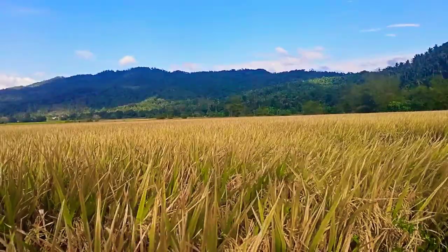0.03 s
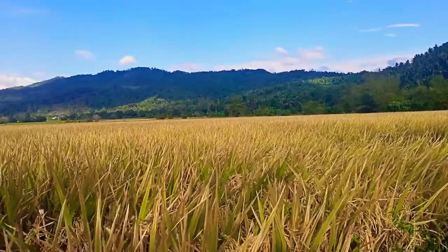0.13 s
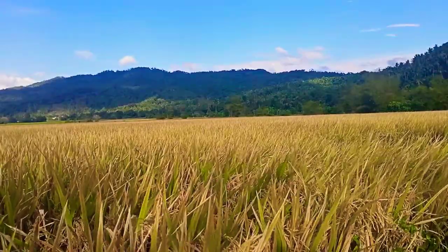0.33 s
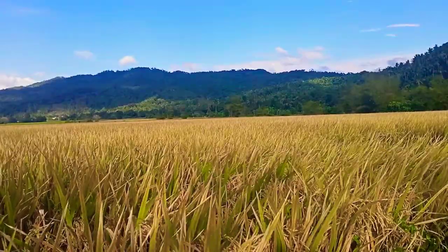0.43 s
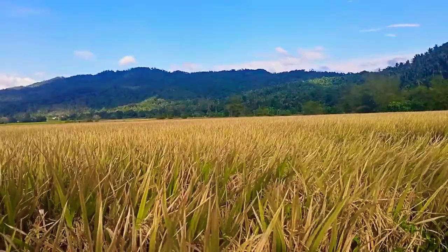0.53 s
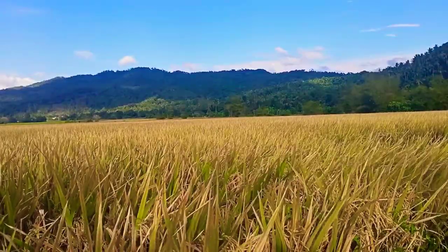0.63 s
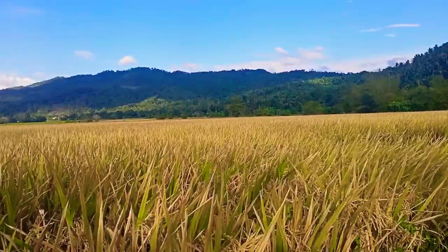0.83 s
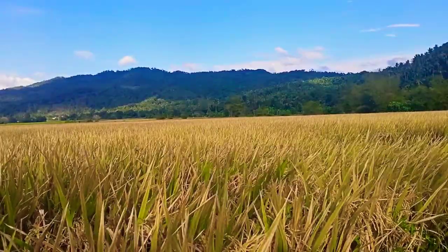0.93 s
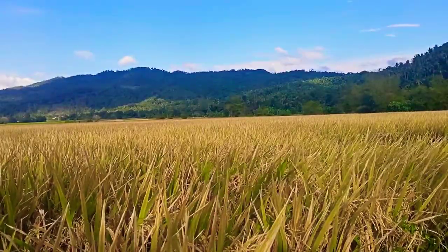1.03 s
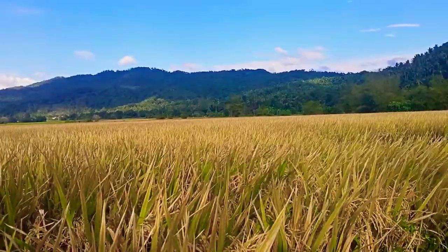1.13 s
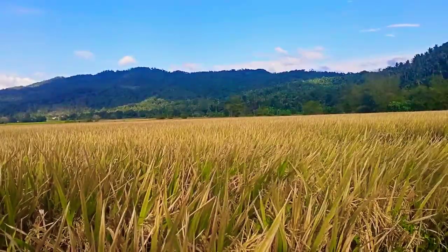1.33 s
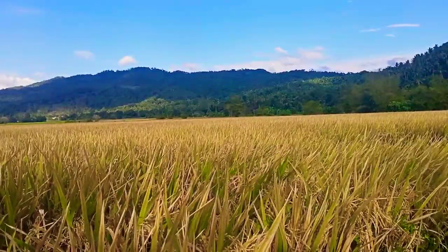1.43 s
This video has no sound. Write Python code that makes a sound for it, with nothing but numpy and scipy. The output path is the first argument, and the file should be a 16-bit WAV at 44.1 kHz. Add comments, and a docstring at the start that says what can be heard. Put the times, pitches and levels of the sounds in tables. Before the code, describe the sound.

Wind buffets the microphone in an open rice field, a low rumble with soft thumps that swells and then eases. Far behind it, leaves rustle softly, insects hiss high and a distant bird gives three faint, thin whistles.

```python
"""A gust of wind buffets the microphone in an open rice field: turbulence rumbles, single eddies thump,
and at the crest the air briefly flutters on the microphone's edge. Behind it, countless leaves blend
into a soft rustle and a far insect chorus hisses near 8 kHz. Two nearer insects buzz above the chorus,
one tiny ping for each wing stroke, and a far bird gives three thin whistles."""
import sys
import numpy as np
from scipy import signal
from scipy.fft import rfft, irfft
from scipy.io import wavfile
from scipy.ndimage import uniform_filter1d

SR = 44100
rng = np.random.default_rng(int(sys.argv[2]) if len(sys.argv) > 2 else 0)


def pcm_store(signal):
    """Save signal as 16-bit PCM."""
    levels = np.round(np.clip(np.atleast_2d(signal), -1, 1) * 32767)
    wavfile.write(sys.argv[1], SR, levels.astype(np.int16).T)


N = 66150
TIME = np.arange(N) / SR


def from_db(db):
    """Decibels to gain."""
    return 10 ** (np.asarray(db) / 20)


def rms_one(x):
    """Scale to unit power."""
    return x / np.sqrt(np.mean(x ** 2) + 1e-20)


def envelope(points):
    """Join (time, value) breakpoints with straight ramps."""
    return np.interp(TIME, *np.transpose(points))


def drift(rate_hz):
    """Smooth random modulation of spread 1, mostly slower than rate_hz."""
    hop, run_in = 40, 2000
    pole = np.exp(-2 * np.pi * hop * rate_hz / SR)
    white = rng.standard_normal(N // hop + run_in + 2)
    slow = signal.lfilter([1], [1, -2 * pole, pole * pole], white)[run_in:]
    return np.interp(np.arange(N) / hop, np.arange(len(slow)), rms_one(slow))


def noise(spectrum):
    """Noise of unit power with the given colour, rolling off below the lowest point."""
    hz, db = np.transpose(spectrum)
    bins_hz = np.fft.rfftfreq(N, 1 / SR) + 1
    colour = from_db(np.interp(np.log(bins_hz), np.log(hz), db))
    roll_off = np.minimum(bins_hz / hz[0], 1) ** 2
    return rms_one(irfft(rfft(rng.standard_normal(N)) * colour * roll_off, N))


def levelled(x, window=1500):
    """Ride out level swings slower than the window, given in samples."""
    power = uniform_filter1d(uniform_filter1d(x ** 2, window), window)
    return x / np.sqrt(power + 1e-9)


def turbulence():
    """Wind on the microphone: a lumpy rumble, with a brighter churn that grows faster than the gust."""
    # swell of the gust: (time [s], level [dB])
    gust = [(0, -47), (.045, -38), (.095, -40.5), (.18, -35.5), (.245, -33.5), (.275, -40), (.42, -28),
            (.48, -33), (.53, -26.5), (.67, -28), (.73, -25), (.83, -27), (.88, -29.5), (.925, -33.5),
            (.95, -29), (1.08, -29.5), (1.165, -33.5), (1.195, -50.5), (1.33, -43), (1.46, -39),
            (1.5, -49.5)]
    # colour of the deep rumble: (frequency [Hz], relative level [dB])
    rumble_spectrum = [(20, -36), (40, -35), (52, -49), (66, -2.5), (90, 1), (125, -4), (175, -11.5),
                       (240, -35.5), (400, -48.5), (800, -54.5)]
    # colour of the faster churning: (frequency [Hz], relative level [dB])
    churn_spectrum = [(60, -35), (130, 0), (205, 5), (290, -8.5), (380, -21), (500, -31), (900, -49)]
    full_gust_db, full_churn_db, churn_growth = -23, -32.5, 1.278
    gust_db = envelope(gust)
    churn_db = full_churn_db + churn_growth * (gust_db - full_gust_db)
    lumps = from_db(2 * drift(rate_hz=17))
    rumble = from_db(gust_db) * levelled(noise(rumble_spectrum))
    churn = from_db(churn_db) * levelled(noise(churn_spectrum))
    high_cut = signal.butter(4, 960, fs=SR, output="sos")
    return signal.sosfilt(high_cut, (rumble + churn) * lumps)


def rustling_plants():
    """Countless leaves blend into a soft hiss that swells and flutters slightly."""
    # colour of the leaves: (frequency [Hz], relative level [dB])
    spectrum = [(100, 2.5), (280, 6.5), (450, 3), (750, 4.5), (1100, 1), (2000, 0), (2900, -0.5),
                (3800, -5.5), (5000, -13.5), (6300, -19.5), (9000, -13), (12500, -27), (15300, -22)]
    # swell of the rustle: (time [s], level [dB])
    swell = [(0, -55), (.27, -55), (.42, -55), (.75, -56.5), (.92, -55), (1.1, -56), (1.35, -55.5),
             (1.5, -55.5)]
    flutter_db = 0.8 * drift(rate_hz=6.5)
    return from_db(envelope(swell) + flutter_db) * noise(spectrum)


def insect_chorus():
    """Many far insects merge into one shimmering band."""
    # colour of the chorus: (frequency [Hz], relative level [dB])
    spectrum = [(6500, -74), (7100, -22), (7500, -7), (7850, 1), (8200, 2), (8600, 2.5), (9000, -4),
                (9300, -8), (9650, -29), (11500, -36)]
    # swell of the chorus: (time [s], level [dB])
    swell = [(0, -56.5), (.11, -53), (.35, -55), (.6, -55), (.8, -56), (1.0, -58), (1.5, -58)]
    shimmer_db = 1.07 * drift(rate_hz=28)
    return from_db(envelope(swell) + shimmer_db) * noise(spectrum)


def wing_buzz(strokes_per_s, pitch_hz, haze_width_hz):
    """Each wing stroke is a short falling ping; scattering in the plants leaves a haze between them."""
    half_width_s, jitter_s, spread_db = .0016, .00022, 0.7
    scatter_hz, sweep_hz_per_s = 49.7, -120000
    count = int(N / SR * strokes_per_s) + 2
    pings = np.zeros(N)
    for k, (late, strength, detune, phase) in enumerate(rng.standard_normal((256, 4))[:count]):
        since = TIME - k / strokes_per_s - jitter_s * late
        near = np.abs(since) < .006
        t = since[near]
        cycles = (pitch_hz + scatter_hz * detune + .5 * sweep_hz_per_s * t) * t
        shape = from_db(spread_db * strength) * np.exp(-.5 * (t / half_width_s) ** 2)
        pings[near] += shape * np.sin(2 * np.pi * (cycles + phase))
    edges_hz = [pitch_hz - haze_width_hz / 2, pitch_hz + haze_width_hz / 2]
    band = signal.butter(2, edges_hz, "band", fs=SR, output="sos")
    haze = from_db(-7) * rms_one(signal.sosfilt(band, rng.standard_normal(N)))
    return rms_one(rms_one(pings) + haze)


def near_insects():
    """Two insects buzz above the chorus, each with its own wing rate and swell."""
    # swell of the lower insect: (time [s], level [dB])
    low_swell = [(0, -73.5), (.27, -69.5), (.48, -75.5), (.65, -74.5), (.69, -70), (.8, -71), (.98, -74),
                 (1.25, -71), (1.31, -66.5), (1.5, -64.5)]
    # swell of the higher insect: (time [s], level [dB])
    high_swell = [(0, -73), (.3, -78), (.5, -79), (.58, -75), (.8, -86), (1.05, -78), (1.22, -72.5),
                  (1.5, -73)]
    low = wing_buzz(strokes_per_s=116.4, pitch_hz=10220, haze_width_hz=360)
    high = wing_buzz(strokes_per_s=124.6, pitch_hz=10760, haze_width_hz=470)
    return from_db(envelope(low_swell)) * low + from_db(envelope(high_swell)) * high


def push_pull(u):
    """Pressure swing of height 1 as an eddy passes, u in half widths."""
    return -u * np.exp(.5 - .5 * u ** 2)


def eddy_thumps():
    """Each eddy is a push and a pull of pressure, rung out by the microphone's low cut."""
    # eddies hitting the microphone: (time [s], level before the low cut [dB], half width [s])
    eddies = [(0.057, -18.5, 0.0024), (0.166, -21, 0.0021), (.196, -14.5, 0.002), (0.233, -16, .0014),
              (.246, -29, 0.0015), (0.33, -25.5, 0.0021), (0.433, -20, 0.0017), (0.444, -24, 0.002),
              (0.51, -15, 0.0012), (.533, -21.5, .001), (0.559, -7, 0.00088), (.636, -17.5, 0.00083),
              (.641, -13, 0.0017), (0.702, -19.5, 0.0037), (.724, -15, 0.0023), (.733, -22, .0013),
              (0.781, -21, 0.0012), (0.794, -12, 0.002), (.895, -21.5, 0.0011), (0.905, -17.5, 0.002),
              (0.959, -13.5, .0018), (.996, -10.5, 0.0013), (1.085, -16, 0.0024), (1.167, -22.5, 0.0031),
              (1.348, -30, 0.0032), (1.46, -30, 0.0019)]
    pressure = np.zeros(N)
    for at_s, db, half_width_s in eddies:
        u = (TIME - at_s) / half_width_s
        tight_core = from_db(-24.5) * push_pull(2.05 * u)
        pressure += from_db(db) * (push_pull(u) + tight_core)
    low_cut = signal.butter(3, 71.3, "high", fs=SR, output="sos")
    return signal.sosfilt(low_cut, pressure)


def far_bird():
    """Thin gliding whistles that start quickly and fade."""
    # whistled notes: (time [s], length [s], start pitch [Hz], end pitch [Hz], level before fading [dB])
    notes = [(.468, .03, 3200, 4100, -57), (.578, .135, 4295, 4020, -59), (.875, .09, 5190, 5060, -71)]
    ramp_s, fade_db = .009, 11
    waver_hz = 10 * drift(rate_hz=120)
    calls = np.zeros(N)
    for at_s, length_s, start_hz, end_hz, db in notes:
        along = np.clip((TIME - at_s) / length_s, 0, 1)
        gate = np.clip(np.minimum(along, 1 - along) * length_s / ramp_s, 0, 1)
        pitch_hz = start_hz + (end_hz - start_hz) * along + waver_hz
        whistle = np.sin(2 * np.pi * np.cumsum(pitch_hz) / SR)
        calls += gate * from_db(db - fade_db * along) * whistle
    return calls


def edge_flutter():
    """At the gust's crest the microphone's edge sheds a short train of vortices at a nearly even rate."""
    at_s, half_width_s = .537, .0079
    swell = np.exp(-.5 * ((TIME - at_s) / half_width_s) ** 2)
    shedding_hz = 205 * (1 + .06 * drift(rate_hz=79))
    return from_db(-13.5) * swell * np.sin(2 * np.pi * np.cumsum(shedding_hz) / SR)


def scene():
    """Wind on the microphone up front; plants, insects and bird behind it, in mono."""
    insects = insect_chorus() + near_insects()
    wind = turbulence() + eddy_thumps()
    return (wind + rustling_plants() + insects + far_bird() + edge_flutter())[None]


def record(dry):
    """A steep high cut takes off the very top."""
    cutoff_hz = 15630
    return signal.sosfilt(signal.ellip(12, .1, 80, cutoff_hz, fs=SR, output="sos"), dry)


dry = scene()
out = record(dry)
pcm_store(out)
```